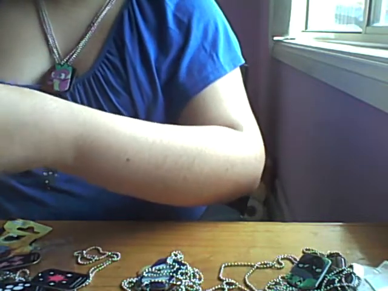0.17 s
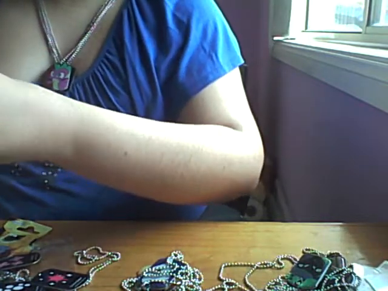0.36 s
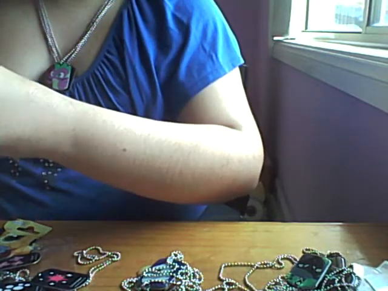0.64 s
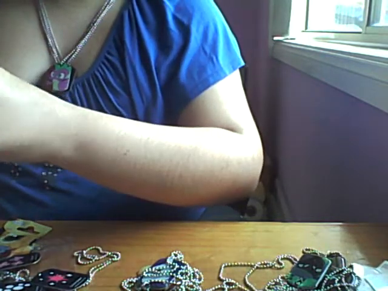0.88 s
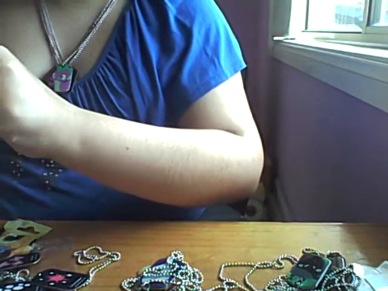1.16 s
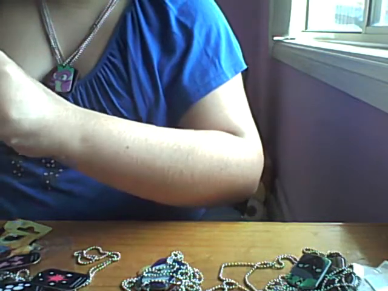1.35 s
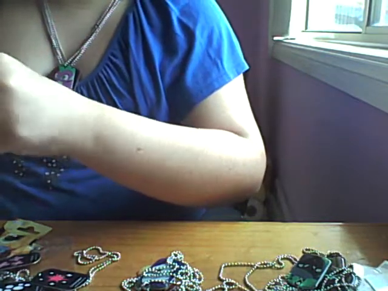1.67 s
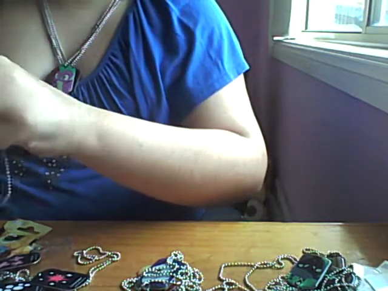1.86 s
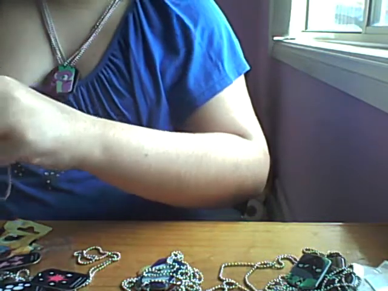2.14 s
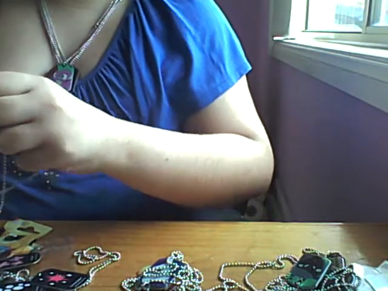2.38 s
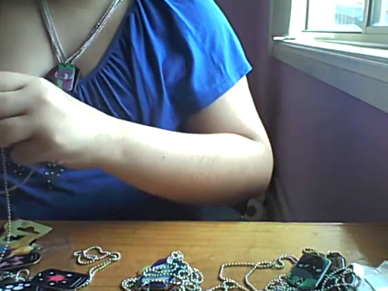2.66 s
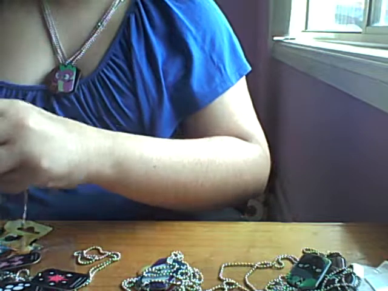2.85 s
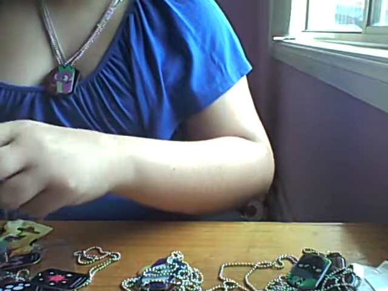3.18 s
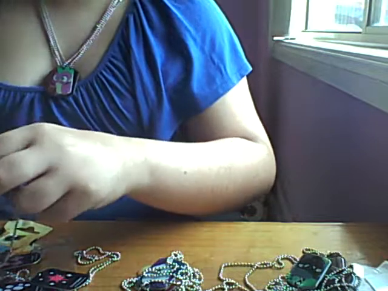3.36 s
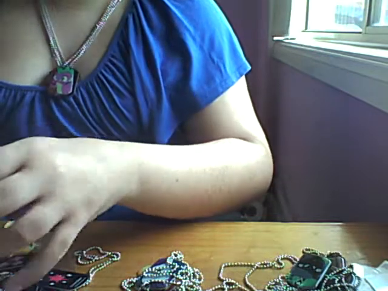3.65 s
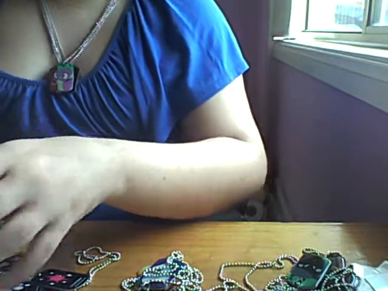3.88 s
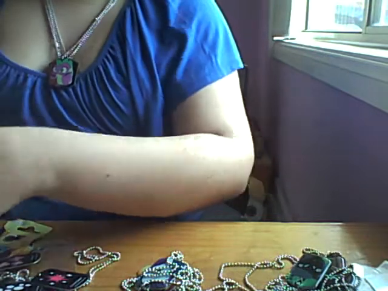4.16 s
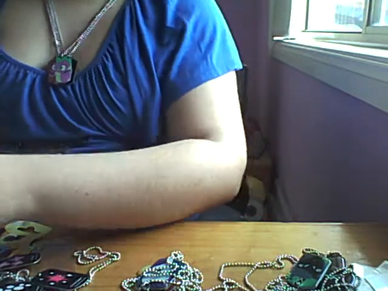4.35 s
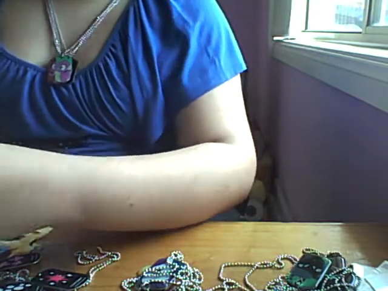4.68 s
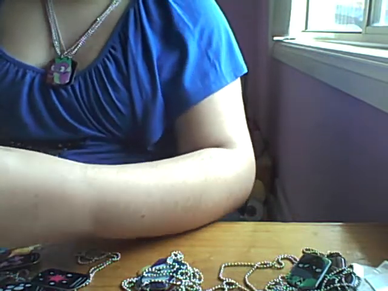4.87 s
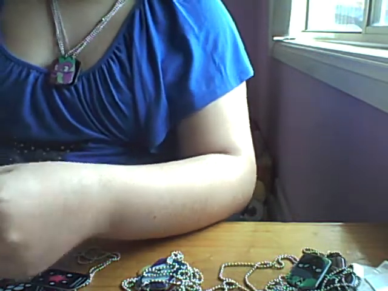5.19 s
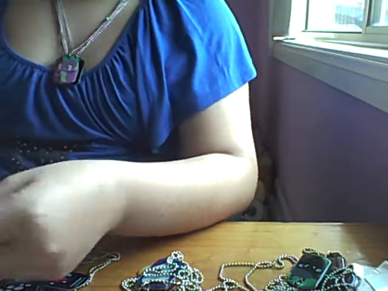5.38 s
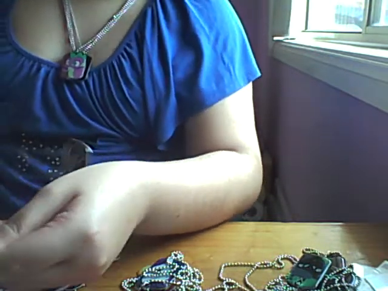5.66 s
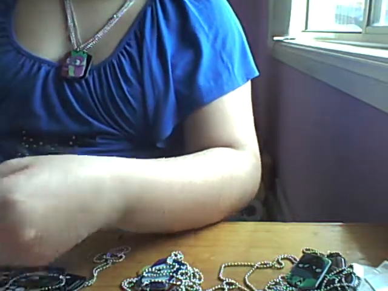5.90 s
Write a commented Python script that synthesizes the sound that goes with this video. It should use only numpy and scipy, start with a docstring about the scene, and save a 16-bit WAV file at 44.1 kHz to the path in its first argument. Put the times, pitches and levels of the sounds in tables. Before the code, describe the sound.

Small metal tags clink and ball chains rattle over a wooden table, with one hard clattering drop midway and a louder, knocking one near the end.

```python
"""Metal tags on a wooden table

Metal tags on ball chains are sorted on a table in a small room, close to a small microphone.
Tags clink (short bursts of contacts that ring) and tap the wood (a dull tock and a tick); chain beads
rattle (random collisions). Bunches land hard twice, the second time with a knock of the table top, and
once faintly in between. Noise suppression and clipping, as of an overloaded microphone, come last."""
import sys
import numpy as np
from scipy import signal
from scipy.fft import rfft, irfft, next_fast_len
from scipy.io import wavfile
from scipy.ndimage import uniform_filter1d

SR = 44100
rng = np.random.default_rng(int(sys.argv[2]) if len(sys.argv) > 2 else 0)


def unload_audio(sound):
    """Save the sound as a 16-bit wav file, at the path given as the first command line argument."""
    columns = np.transpose(np.atleast_2d(sound))
    # keep every value between -1 and 1, then stretch to whole-number steps
    steps = np.round(np.clip(columns, -1, 1) * 32767)
    wavfile.write(sys.argv[1], SR, steps.astype(np.int16))


N = 265923  # length of the scene in samples
SIZE = 8192  # length of one short sound in samples
HZ, T = np.fft.rfftfreq(SIZE, 1 / SR), np.arange(SIZE) / SR

# Levels in the tables are starting levels: the functions trim and filter them further.
# Tag against tag. Each row: start in seconds, level in dB, level of the 1-4 kHz knock in dB
# relative to that, strongest ring in Hz.
CLINK_EVENTS = [(0.1146, -28, -19.5, 4900), (0.12, -26.5, -24, 5530), (0.184, -38.5, -20, 7500),
                (0.627, -40, -19, 7450), (1.935, -35, -1.5, 5260), (1.951, -31.5, -6, 6100),
                (2.81, -29.5, -19.5, 5540), (2.9291, -16, -10, 6720), (3.028, -27, -28, 6100),
                (3.089, -42, -15, 5160), (3.105, -23.5, -12.5, 6060), (3.156, -33.5, -5, 6240),
                (3.211, -25.5, -11, 5300), (3.228, -24.5, -15.5, 6340), (3.2688, -29.5, -27, 6230),
                (3.292, -29, -18.5, 5200), (3.392, -42.5, -5.5, 5060), (3.411, -33, -15.5, 5200),
                (3.434, -29, -33.5, 6080), (3.594, -29.5, -17, 4960), (3.6453, -22.5, -16, 5340),
                (3.664, -28.5, -33, 5300), (3.69, -34.5, -25, 5240), (3.865, -24.5, -9, 5930),
                (3.964, -39, -14, 5100), (4.136, -30, -13.5, 6900), (4.221, -14.5, -17, 5600),
                (4.233, -18, -10, 7200), (4.259, -29.5, -29, 6860), (4.273, -29.5, -43, 5260),
                (4.336, -39, -3, 6530), (4.683, -24, -10.5, 5010), (4.7178, -22.5, -26, 7340),
                (4.8216, -32, -49, 6840), (4.899, -38, -7.5, 5100), (5.326, -39, -20, 7140),
                (5.3301, -31.5, -1, 5200), (5.447, -40, -4, 5930), (5.467, -23.5, -5, 4820),
                (5.502, -23, -22, 4940), (5.727, -27.5, -16, 6190), (5.8534, -5.5, -4.5, 7340),
                (5.891, -11.5, -8, 5380), (5.917, -17, -11, 6370), (5.9571, -19, -7, 6540),
                (6.026, -27, -4, 5870)]
# Tag or finger on the wood. Each row: start in seconds, level in dB, treble in dB relative to that,
# time for the clatter to fall 60 dB in seconds, strongest ring in Hz.
TAP_EVENTS = [(0.149, -37, -28, 0.11, 1550), (0.304, -37, 0, 0.072, 1430), (1.4, -45, 0, 0.045, 1530),
              (2.2237, -41.5, -2.5, 0.028, 1650), (3.067, -33.5, 12.5, 0.19, 4610),
              (3.357, -43.5, 7, 0.032, 1570), (3.882, -36, 9, 0.12, 3120), (3.97, -39, -5, 0.038, 1057),
              (4.088, -40.5, -21, 0.12, 1930), (4.182, -30.5, 10, 0.049, 1950),
              (4.19, -30.5, -1, 0.12, 2020), (4.362, -46, -8, .04, 1080), (4.403, -39.5, -0.5, 0.029, 1830),
              (4.4918, -36, -35, 0.021, 1900), (4.557, -36.5, -9, 0.24, 1760),
              (4.5979, -29.5, 10.5, 0.18, 2100), (4.633, -27, 6, 0.067, 1080),
              (5.955, -19.5, -2.5, 0.039, 1940), (6.018, -47, -4, 0.064, 1680)]
# A bunch lands. Each row: start in seconds, metal in dB, table top in dB, low thump in dB,
# time for the clatter to fall 60 dB in seconds.
DROP_EVENTS = [(2.909, -8, -26, -33.5, 0.07), (5.725, -48, -44, -46.5, 0.056),
               (5.8266, -8, 2.5, -25, 0.037)]
# A chain is pulled briskly. Each row: start in seconds, end in seconds, bead level in dB,
# scrape on the wood in dB.
CHAIN_PULLS = [(2.776, 2.821, -35, -48.5), (2.854, 2.922, -41.5, -51.5), (3.066, 3.123, -36, -52),
               (3.156, 3.193, -36, -44), (3.409, 3.471, -44, -73), (3.636, 3.672, -35, -46),
               (3.863, 3.897, -38.5, -37), (4.139, 4.202, -38.5, -33), (4.602, 4.705, -43.5, -41.5),
               (5.472, 5.523, -39.5, -49.5)]
# The hand stirs the chains all the while. Each row: time in seconds, bead level in dB,
# scrape on the wood in dB.
CHAIN_STIRRING = [(0.4, -91.5, -90), (0.9, -64, -62), (1.1, -76, -61.5), (1.35, -66.5, -58),
                  (1.7, -72.5, -98), (2.2, -62, -59), (2.74, -73.5, -83), (3.021, -70.5, -61),
                  (3.251, -50.5, -64), (3.53, -67.5, -74), (3.819, -69, -65), (3.92, -70, -48.5),
                  (4.131, -56.5, -51.5), (4.5, -64.5, -55), (4.8, -86.5, -71.5), (5.3, -60.5, -83),
                  (5.68, -74.5, -81.5), (6.0, -49.5, -41)]
# Ringing tones of a tag. Each row: frequency in Hz, level in dB, time to fall 60 dB in seconds.
TAG_MODES = [(3670, -10, .03), (4550, 0, .04), (4960, 0, .05), (5150, 0, .07), (5400, 3, .045),
             (5940, 4, .03), (6350, 0, .035), (6860, -1, .055), (6970, 0, .045), (7120, -1, .045),
             (7900, -6, .03)]
# Ringing tones of the table top. Each row: frequency in Hz, level in dB, time to fall 60 dB in seconds.
TABLE_MODES = [(126, -6, .23), (213, 5, .25), (353, -5, .25), (822, -3, .14), (1015, -4, .16),
               (1120, -4, .16), (1268, 0, .13), (1345, -2, .14), (1578, 1, .14), (1654, -3, .16),
               (1808, -3, .15), (1944, 1, .15), (2052, -1, .14), (2831, -4, .19)]
# Tone colour of a clink's bright click. Each row: frequency in Hz, gain in dB.
CLICK_COLOUR = [(3000, -29), (4300, -30.5), (4900, -5.5), (5300, -5), (6000, -6.5), (6900, -2),
                (7500, -6.5), (8500, 0), (11000, -32.5)]
# Tone colour of a clink's lower knock. Each row: frequency in Hz, gain in dB.
KNOCK_COLOUR = [(60, -36.5), (200, -12.5), (900, -23.5), (1700, -4), (2100, -2.5), (2500, -8), (3600, 4.5),
                (4300, 3), (5200, -21), (8000, -43.5)]
# Tone colour of the wood, tapped or scraped. Each row: frequency in Hz, gain in dB.
WOOD_COLOUR = [(60, -38.5), (180, -4.5), (320, -5), (520, -11.5), (1100, -1), (1400, -2), (1900, 1.5),
               (2400, -6), (3500, -10), (8000, -41)]
# Tone colour of a metal edge on the table. Each row: frequency in Hz, gain in dB.
EDGE_COLOUR = [(1500, -14), (2900, 3), (4200, 4), (6000, -0.5), (8500, -1), (11000, -69)]
# Tone colour of the colliding beads. Each row: frequency in Hz, gain in dB.
BEAD_COLOUR = [(200, -18), (1500, -22), (2400, -5), (3800, -2.5), (5200, 3), (6100, 2), (7000, -4),
               (8500, 9.5), (11000, -35.5)]
# Tone colour of many tags landing at once. Each row: frequency in Hz, gain in dB.
CRASH_COLOUR = [(60, -29.5), (160, -17), (600, -19), (2000, -18.5), (2400, -3.5), (4500, 0), (5800, -0.5),
                (6700, 3.5), (8500, 1.5), (11000, -32.5)]
# Tone colour of the blow on the table top. Each row: frequency in Hz, gain in dB.
BOARD_COLOUR = [(40, -40), (90, -32), (200, -14), (450, -3), (700, -0.5), (1300, 1.5), (2000, -2),
                (2900, -3.5), (3700, -25.5), (8000, -39)]
# Tone colour of the low thump of a drop. Each row: frequency in Hz, gain in dB.
THUMP_COLOUR = [(50, -59), (85, -26), (125, 1.5), (185, -4), (280, -3), (600, -25), (2000, -66.5)]
# Echoes of the room. Each row: frequency in Hz, time to fall 60 dB in seconds.
ROOM_DECAY = [(150, 0.58), (1000, 0.27), (4000, 0.37), (8000, 0.27)]
# Response of the microphone. Each row: frequency in Hz, gain in dB.
MIC_RESPONSE = [(30, -31), (80, -26), (120, 1.5), (7100, 1), (8000, -11.5), (8700, -25.5), (9400, -33),
                (10500, -82.5)]
# Tone colour of the background noise. Each row: frequency in Hz, gain in dB.
HUSH_COLOUR = [(40, -15), (90, -35.5), (135, -1.5), (200, 0.5), (500, -5), (1000, -2), (1300, -10),
               (1700, -6.5), (2300, -10), (3500, -14.5), (4700, -21), (5900, -23), (8000, -32), (9000, -60)]
# Narrow colours of the background. Each row: frequency in Hz, width in Hz, boost in dB.
HUSH_BUMPS = [(1080, 45, 8), (1587, 390, 8), (2450, 70, 0.5), (2932, 100, 7), (5250, 66, 1.5),
              (6400, 260, 8)]

# Usual clink: time to fall 60 dB. Chatter after it: level for a usual clink, fall time, mean contact rate.
CLINK_T60_S = .03
CHATTER_DB, CHATTER_T60_S, CHATTER_PER_S = -27, .12, 450
THUMP_T60_S = .17
# How quickly a pull of the chain swells and stops.
PULL_RISE_S, PULL_FALL_S = 0.011, 0.0033
# The chain trails after a drop: beads against the metal, scrape against the table top, speed of fading.
TRAIL_DB, TRAIL_WOOD_DB, TRAIL_FALL_DB_PER_S = -13.5, -28, 133.5
# Resonance of the spot where a bead lands or scrapes.
BEAD_FOCUS_DB, SCRAPE_FOCUS_DB = 13, 8
HUSH_DB = -54.5  # before noise suppression
FULL_SCALE, LOW_CUT_HZ, TOP_CUT_HZ = 1, 77, 15800


def clinks(click_db=-2.0, modes_db=-15.0, knock_db=-4.0, focus_db=13.5, focus_width_hz=280, rise_s=0.00048):
    """Each clink favours the modes near one frequency, set by where the tag is struck; then the tags chatter."""
    out, tag = np.zeros(N), ringing(TAG_MODES)
    for start, db, knock, hz in CLINK_EVENTS:
        contacts = clatter(CLINK_T60_S * lasting(db), rise_s)
        click = peaked(colour(contacts, read(CLICK_COLOUR) + focus_db * bump(hz, focus_width_hz)))
        # No two tags are quite the same size: each rings up to 1 % higher.
        this_tag = np.interp(T * rng.uniform(1.0, 1.01), T, tag)
        ring = peaked(signal.fftconvolve(click, this_tag)[:SIZE])
        metal = peaked(click + amp(modes_db) * ring)
        # The harder the clink, the stronger and longer the chatter.
        touches = clatter(CHATTER_T60_S * lasting(db), per_s=CHATTER_PER_S)
        chatter_level = amp(CHATTER_DB) * lasting(db) ** 4
        chatter = chatter_level * peaked(signal.fftconvolve(touches, this_tag)[:SIZE])
        body = amp(knock + knock_db) * peaked(colour(contacts, read(KNOCK_COLOUR)))
        add(out, start, amp(db) * (amp(click_db) * metal + chatter + body))
    return out


def lasting(db, usual_db=-30, doubling_db=50):
    """Harder clinks rebound for longer: a factor on the usual clatter time."""
    return 2 ** ((db - usual_db) / doubling_db)


def taps(wood_db=-3.0, edge_db=-6.5, focus_db=7.5, focus_width_hz=280, rise_s=0.00051, edge_share=0.23):
    """Light blows on the table: a dull tock, pitched by the spot that is hit, and the tick of a metal edge."""
    out = np.zeros(N)
    for start, db, treble, t60, hz in TAP_EVENTS:
        focus = focus_db * bump(hz, focus_width_hz)
        tock = peaked(colour(clatter(t60, rise_s), read(WOOD_COLOUR) + focus))
        # The tick dies sooner than the tock.
        tick = peaked(colour(clatter(edge_share * t60, rise_s), read(EDGE_COLOUR) + focus))
        add(out, start, amp(db) * (amp(wood_db) * tock + amp(edge_db + treble) * tick))
    return out


def drops(modes_db=-14.5):
    """Many tags land at once, thump the table and set its top ringing."""
    out = np.zeros(N)
    for start, metal_db, table_db, thump_db, t60 in DROP_EVENTS:
        crash = peaked(colour(clatter(t60, rise_s=0.000067, per_s=3600), read(CRASH_COLOUR)))
        blow = peaked(colour(clatter(t60, rise_s=0.00022, per_s=4000), read(BOARD_COLOUR)))
        thump = peaked(colour(clatter(THUMP_T60_S), read(THUMP_COLOUR)))
        table_top = blow + amp(modes_db) * peaked(ringing(TABLE_MODES))
        add(out, start, amp(metal_db) * crash + amp(table_db) * table_top + amp(thump_db) * thump)
    return out


def chains(beads_db=0.0, scrape_db=-4.0, modes_db=-14, beads_per_s=1000, slow_beads_per_s=450,
           slips_per_s=700, spread_db=3.5, brisk_db=-36, slow_jerk_db=5.5, brisk_jerk_db=0.0):
    """Beads collide along a sliding chain and bump over the wood; slow slides give fewer, faint ticks in clumps."""
    bead_level, wood_level = chain_motion()
    speed = np.minimum(bead_level / amp(brisk_db), 1)  # 0 is still, 1 is brisk
    uneven = (1 - speed) * jerks(slow_jerk_db) + speed * jerks(brisk_jerk_db)
    beads = bead_level * uneven * grains(slow_beads_per_s + beads_per_s * speed, spread_db)
    slips = wood_level * uneven * grains(slips_per_s, spread_db)
    rattle = scatter(beads, BEAD_COLOUR, lo_hz=3287, hi_hz=7594, focus_db=BEAD_FOCUS_DB, width_hz=250)
    # The rattle makes the tags ring along.
    tag_ring = evened(signal.oaconvolve(rattle, ringing(TAG_MODES))[:N])
    jingle = amp(modes_db) * rattle.std() * tag_ring
    scraping = scatter(slips, WOOD_COLOUR, lo_hz=700, hi_hz=3800, focus_db=SCRAPE_FOCUS_DB, width_hz=277)
    return amp(beads_db) * (rattle + jingle) + amp(scrape_db) * scraping


def chain_motion():
    """Strength of bead rattle and of scraping over time: stirred, pulled, or trailing after a drop."""
    t = np.arange(N) / SR
    times, bead_db, wood_db = np.transpose(CHAIN_STIRRING)
    beads = amp(np.interp(t, times, bead_db))
    wood = amp(np.interp(t, times, wood_db))
    for start, end, db, scrape_db in CHAIN_PULLS:
        pull = np.clip(np.minimum((t - start) / PULL_RISE_S, (end - t) / PULL_FALL_S), 0, 1)
        beads = np.maximum(beads, amp(db) * pull)
        wood = np.maximum(wood, amp(scrape_db) * pull)
    for start, metal_db, table_db, *_ in DROP_EVENTS:
        settling = np.minimum(T / PULL_RISE_S, 1) * amp(-TRAIL_FALL_DB_PER_S * T)
        add(beads, start, amp(metal_db + TRAIL_DB) * settling)
        add(wood, start, amp(table_db + TRAIL_WOOD_DB) * settling)
    return beads, wood


def jerks(depth_db, size=400):
    """A dragged chain catches and slips: an uneven gain of mean power 1 that changes every few milliseconds."""
    smooth = uniform_filter1d(rng.standard_normal(N), size=size)
    catch = evened(uniform_filter1d(smooth, size=size // 4))
    return evened(amp(depth_db * np.minimum(catch, 2)))


def grains(per_s, spread_db):
    """Random collisions of uneven strength, of mean power about 1 at any rate."""
    strength = evened(amp(spread_db * np.minimum(rng.exponential(1, N), 3)))
    chance = per_s / SR
    hits = rng.choice([-1, 1], N) * (rng.random(N) < chance)
    return strength * hits / np.sqrt(chance)


def scatter(hits, spectrum, lo_hz, hi_hz, focus_db, width_hz, count=8):
    """Each collision lands on one of several spots, each with its own resonance."""
    spot, out = rng.integers(0, count, N), np.zeros(N)
    for k in range(count):
        hz = lo_hz + (hi_hz - lo_hz) * k / (count - 1)
        spot_db = read(spectrum) + focus_db * bump(hz, width_hz)
        out = out + colour(hits * (spot == k), spot_db, size=256)
    return hits.std() * evened(out)


def clatter(t60, rise_s=.001, per_s=3500):
    """Contact builds up, then dies in a spray of rebounds and close reflections."""
    hits = rng.choice([-1, 1], SIZE) * (rng.random(SIZE) < per_s / SR)
    strength = hits * rng.uniform(.3, 1, SIZE)
    return strength * (1 - np.exp(-T / rise_s)) * amp(-60 * T / max(t60, .005))


def ringing(modes):
    """The sound of a table of damped modes after one blow."""
    return sum(amp(db - 60 * T / t60) * np.sin(2 * np.pi * (hz * T + rng.random()))
               for hz, db, t60 in modes)


def room(x):
    """Sparse reflections, each band dying at its own speed."""
    delay = np.arange(SR // 2) / SR
    # The first echo comes after 6 ms.
    echoes = rng.choice([-1., 1.], len(delay)) * (rng.random(len(delay)) < 4000 / SR) * (delay > .006)
    hz, t, bands = signal.stft(echoes, SR, nperseg=256)
    fading = amp(-60 * t / read(ROOM_DECAY, hz)[:, None])
    tail = signal.istft(bands * fading, SR, nperseg=256)[1]
    return signal.fftconvolve(x, tail / np.linalg.norm(tail))[:N]


def hush():
    """Steady background noise with a few narrow colours."""
    peaks = sum(db * bump(hz, width) for hz, width, db in HUSH_BUMPS)
    noise_db = read(HUSH_COLOUR) + peaks - 40 * (HZ > 9000)
    return amp(HUSH_DB) * evened(colour(rng.standard_normal(N), noise_db))


def amp(db):
    """Decibels to gain."""
    return 10 ** (np.asarray(db) / 20)


def read(points, hz=HZ):
    """Reads a table between its points, on a log-frequency axis."""
    f, value = np.transpose(points)
    return np.interp(np.log(hz + 1), np.log(f), value)


def bump(centre, width, hz=HZ):
    """A resonance as a bell of height 1."""
    return np.exp(-((hz - centre) / width) ** 2)


def colour(x, db, size=1024):
    """Filter that never sounds ahead of its input, with the given gain on the HZ grid."""
    log_gain = np.log(amp(np.maximum(db, -100)))
    circle = np.concatenate([log_gain, log_gain[-2:0:-1]])
    # The Hilbert transform of the log gain gives the matching minimum phase.
    response = irfft(np.exp(np.conj(signal.hilbert(circle)))[:len(HZ)])
    return signal.oaconvolve(x, response[:size])[:len(x)]


def evened(x):
    """Scales to rms 1."""
    return x / np.sqrt(np.mean(x ** 2) + 1e-20)


def peaked(x):
    """Scales the loudest 4 ms to rms 1."""
    return x / np.sqrt(uniform_filter1d(x ** 2, size=176).max() + 1e-20)


def add(mix, s, sound):
    """Mixes a sound in at time s in seconds."""
    part = mix[round(s * SR):][:len(sound)]
    part += sound[:len(part)]


def scene(small_room_db=-28.5, drop_room_db=-11.0):
    """Small sounds stay almost dry; the drops wake the room."""
    small, big = clinks() + taps() + chains(), drops()
    echoes = room(amp(small_room_db) * small + amp(drop_room_db) * big)
    return (colour(small + big + echoes, read(MIC_RESPONSE)) + hush())[None]


def suppress(x, depth_db=7.0, shut_db=4.5, knee_db=8.5, count=18):
    """Noise suppressor: turns down each band unless it stands clear of its quietest level, cutting tails short."""
    size = next_fast_len(N + SIZE)
    # Overlapping bands lie 500 Hz apart; the last one takes everything above.
    place = np.minimum(np.fft.rfftfreq(size, 1 / SR) / 500, count - 1)
    spectrum, out = rfft(x, size), np.zeros(N)
    for k in range(count):
        band = irfft(spectrum * np.maximum(1 - abs(place - k), 0), size)[:N]
        power = abs(uniform_filter1d(band ** 2, size=256)) + 1e-14
        quietest = uniform_filter1d(power, size=8192).min()
        clear_db = 10 * np.log10(power / quietest)
        opening = np.clip((clear_db - shut_db) / knee_db, 0, 1)
        out = out + band * amp(depth_db * (opening - 1))
    return out


def record(dry):
    """Noise suppression, clipping at full scale, a low cut, then the band limit."""
    clipped = np.clip(suppress(dry[0]), -FULL_SCALE, FULL_SCALE)
    low_cut = signal.butter(2, LOW_CUT_HZ, "highpass", fs=SR, output="sos")
    cut = signal.sosfiltfilt(low_cut, clipped)
    band_limit = signal.firwin(511, TOP_CUT_HZ, window=("kaiser", 9), fs=SR)
    return signal.oaconvolve(cut, band_limit, "same")[None]


dry = scene()
out = record(dry)
unload_audio(out)
```